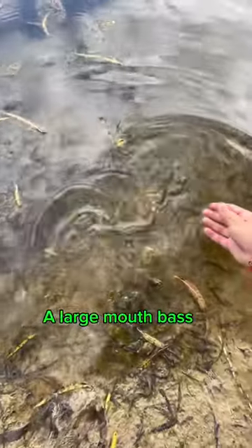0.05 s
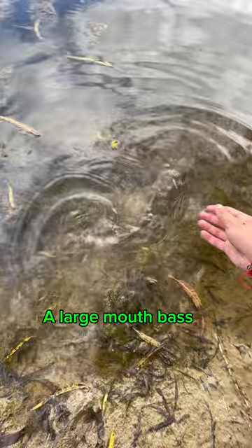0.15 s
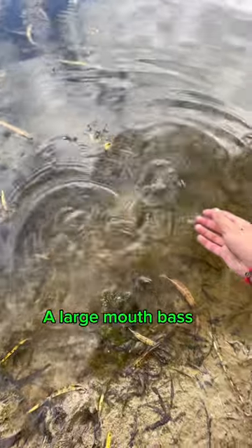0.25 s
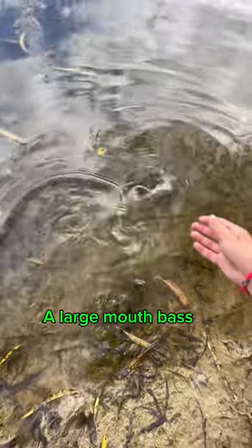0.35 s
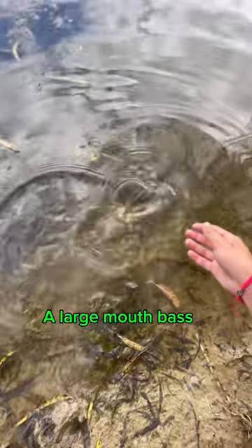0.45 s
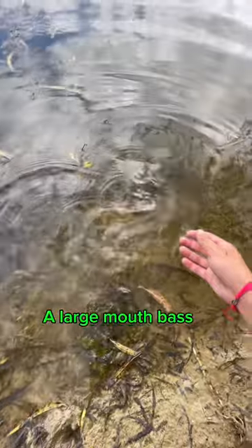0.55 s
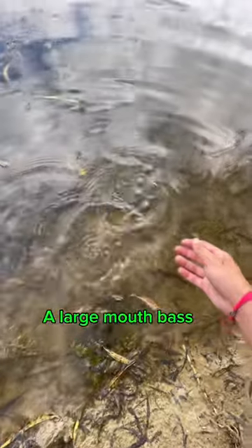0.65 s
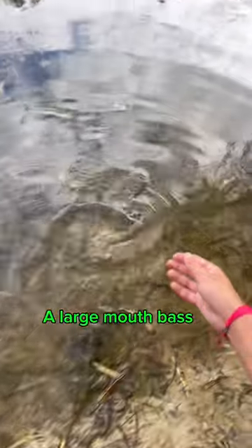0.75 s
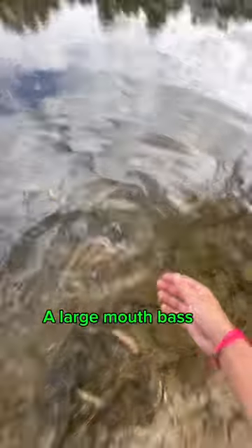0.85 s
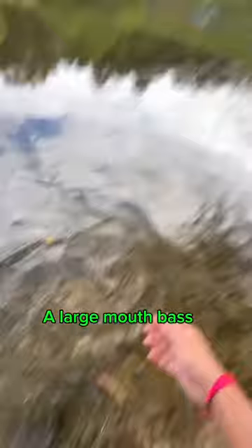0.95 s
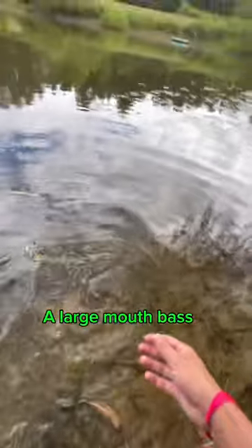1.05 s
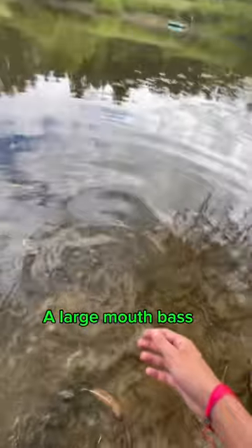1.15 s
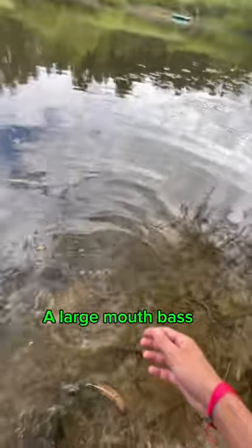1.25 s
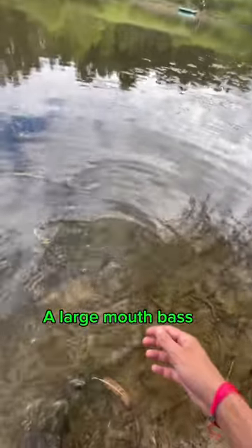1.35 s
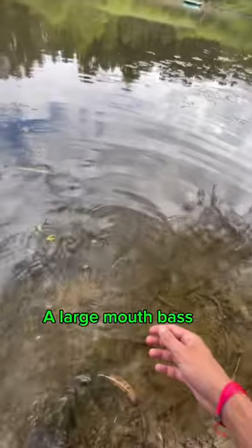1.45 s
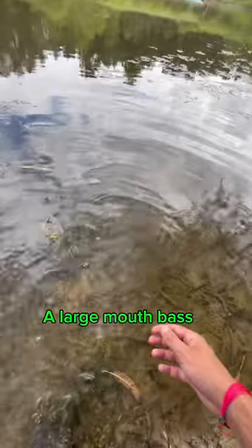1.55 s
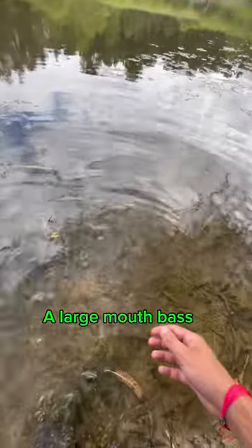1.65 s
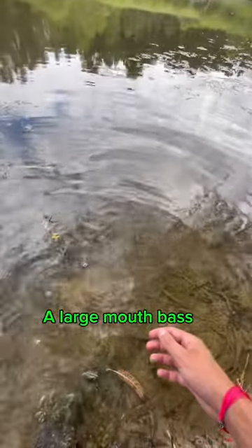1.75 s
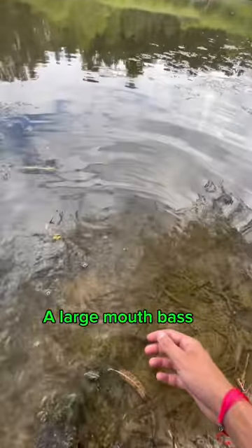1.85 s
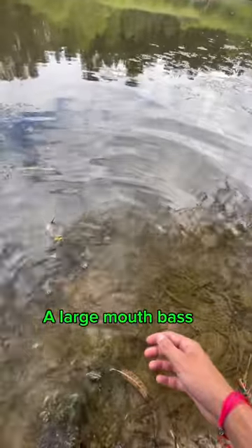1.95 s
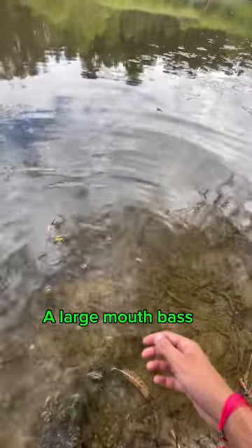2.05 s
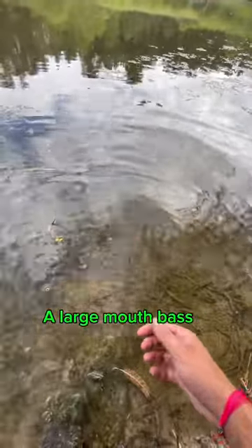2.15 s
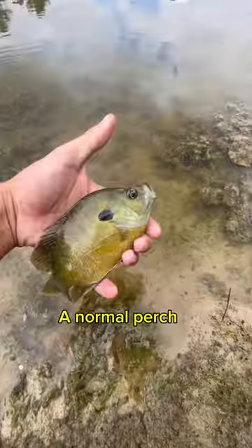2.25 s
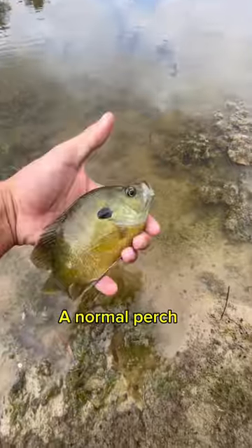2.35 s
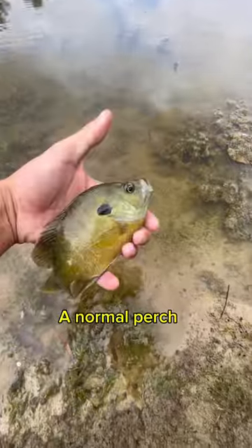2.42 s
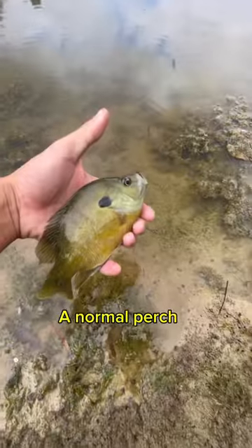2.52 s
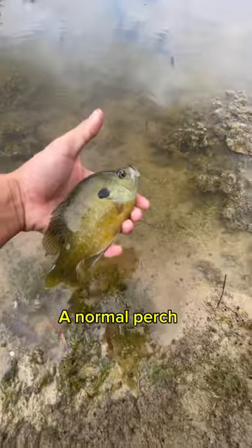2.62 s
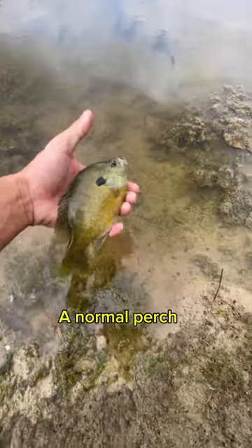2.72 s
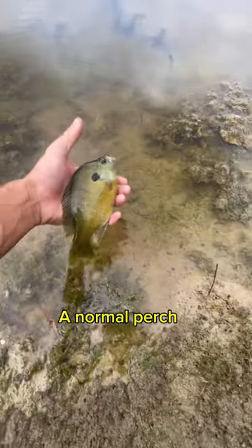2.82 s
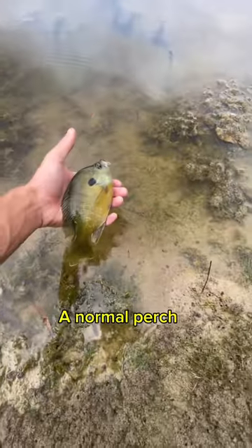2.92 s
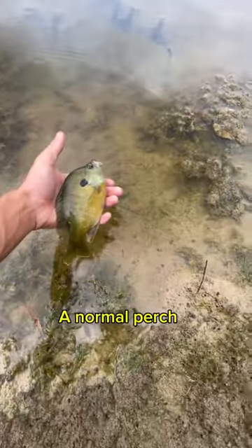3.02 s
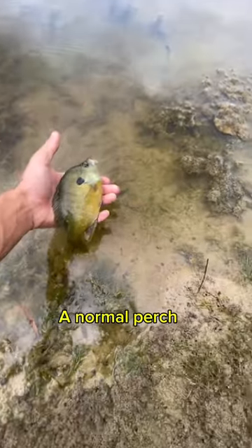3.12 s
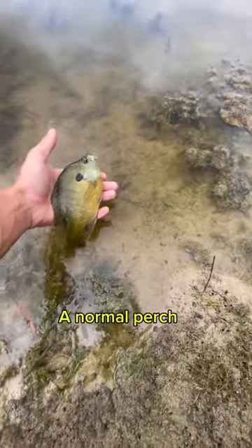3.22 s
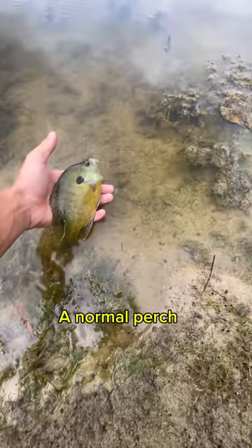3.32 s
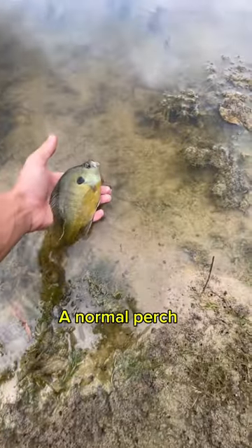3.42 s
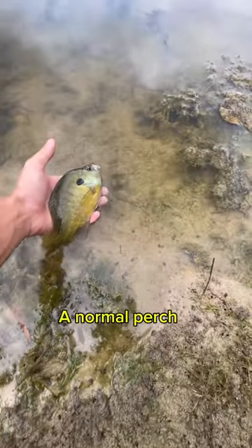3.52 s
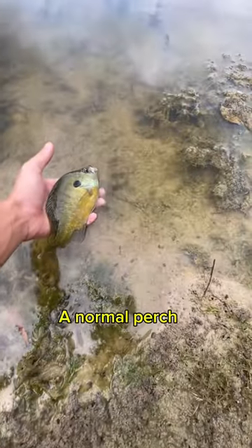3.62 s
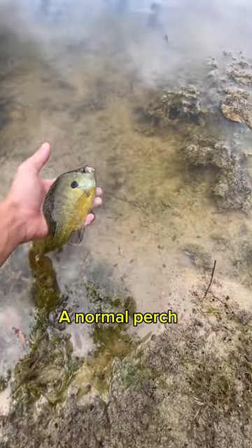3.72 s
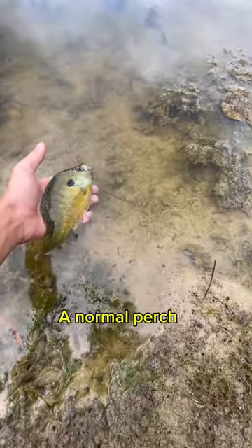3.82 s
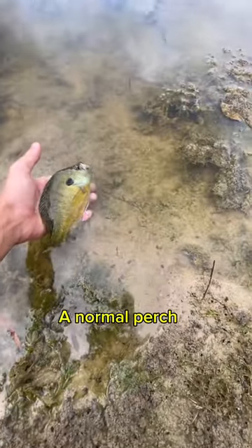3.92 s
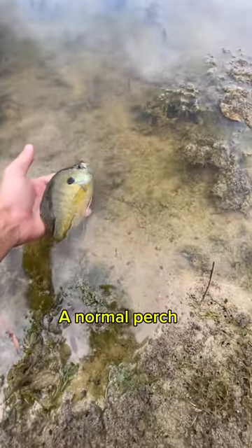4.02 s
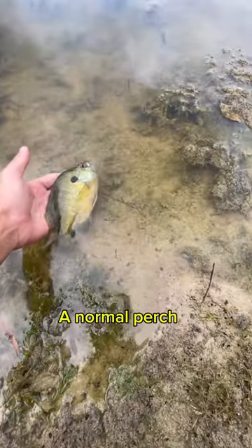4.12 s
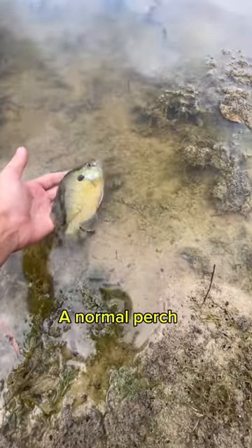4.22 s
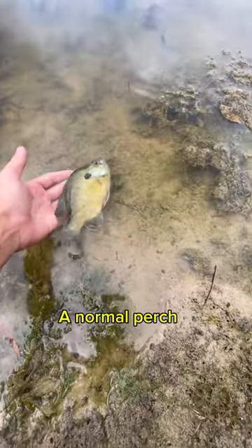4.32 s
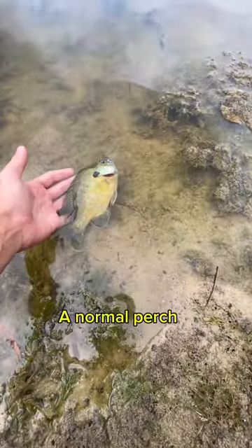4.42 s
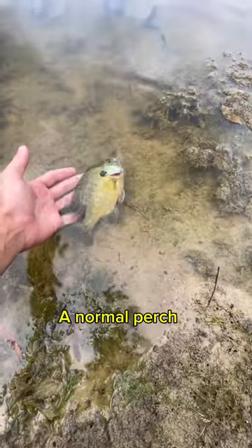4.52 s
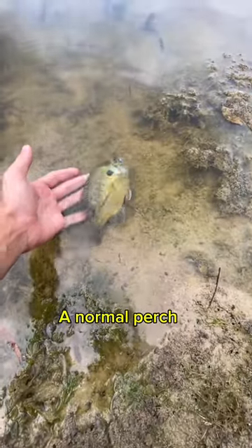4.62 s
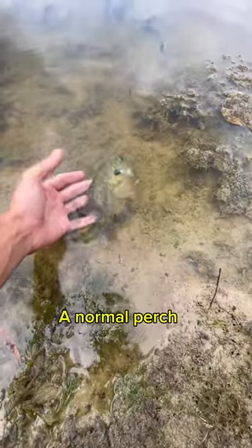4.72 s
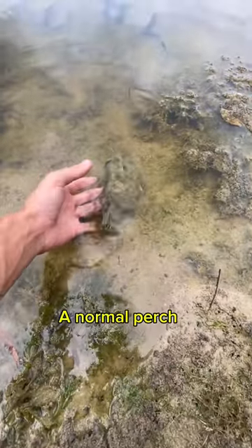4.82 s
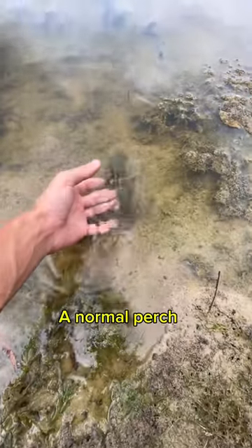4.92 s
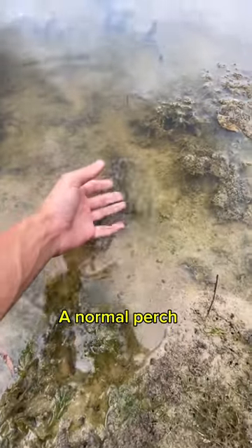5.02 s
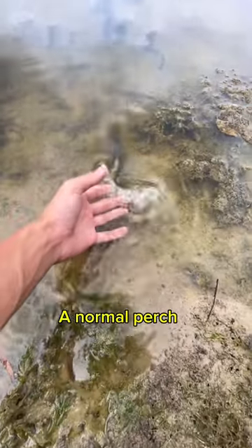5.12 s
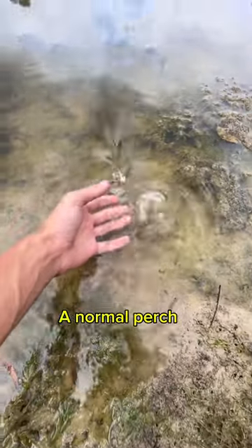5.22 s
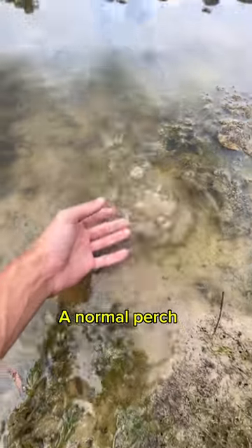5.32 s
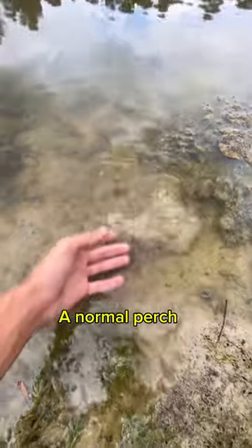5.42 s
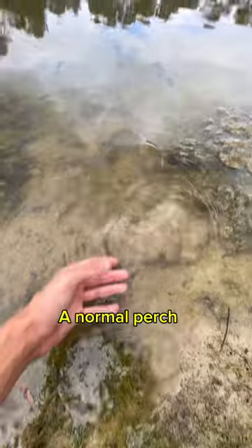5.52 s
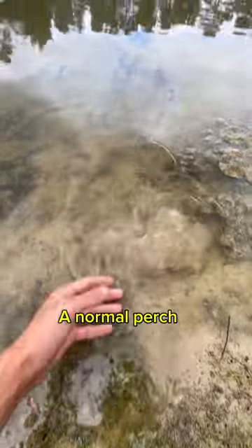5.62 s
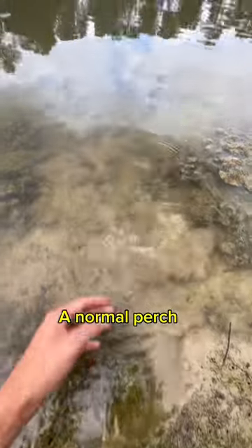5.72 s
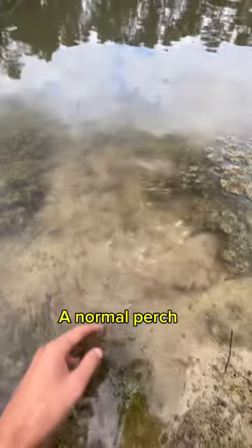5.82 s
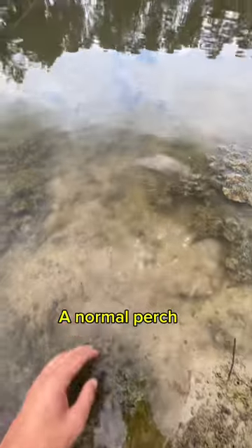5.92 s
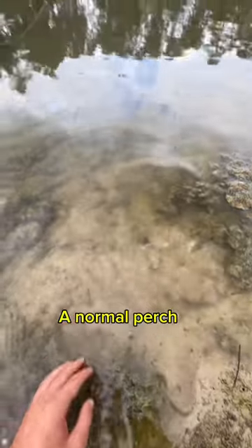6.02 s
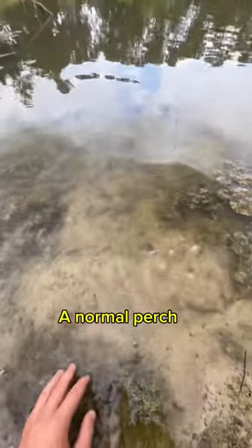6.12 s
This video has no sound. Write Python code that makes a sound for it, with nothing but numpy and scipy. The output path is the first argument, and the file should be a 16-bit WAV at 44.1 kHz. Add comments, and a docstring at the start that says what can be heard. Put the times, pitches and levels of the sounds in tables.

```python
"""Two fish let go in a pond

Two fish are let go by hand in the shallows, close to a phone: the first leaves with a round plop of ringing bubbles.
At a second spot the hand shifts and drips, then a tail flick throws up bubbles and spray that patters back.
Bubbles are gliding sines; drops, spray and wet skin are bursts and clicks of filtered noise.
Small birds whistle from the far bank over soft outdoor air, made of filtered noise.
At the first spot high insects sing too, and a distant engine drones as a low line in rumble."""
import sys
import numpy as np
from scipy import signal
from scipy.fft import rfft, irfft
from scipy.io import wavfile
from scipy.ndimage import uniform_filter1d

SR = 44100
rng = np.random.default_rng(int(sys.argv[2]) if len(sys.argv) > 2 else 0)


def store_pcm(level_fs):
    """Save levels as 16-bit WAV."""
    pcm = np.round(np.clip(level_fs, -1, 1) * 32767).astype(np.int16)
    wavfile.write(sys.argv[1], SR, np.atleast_2d(pcm).T)


N = 271995
TIME = np.arange(N) / SR  # s
FREQ = np.maximum(np.fft.rfftfreq(N, 1 / SR), 1)  # Hz, kept above 0 for logarithms
LEFT_RIGHT = np.array([[1], [-1]])
LEFT_ONLY = np.array([[1], [0]])
MOVE_S = 2.15  # from here on the second spot

# the tail flick: the water is thrashed for a moment, and midway the cavity behind the tail collapses
FLICK_S, COLLAPSE_S, FLICK_END_S = 5.023, 5.142, 5.213
FLICK_ATTACK_S, FLICK_RELEASE_S, COLLAPSE_WIDTH_S, SETTLE_S = 0.022, 0.006, 0.023, 0.09


# the loudest air pockets ringing in the water: t/s, first f/Hz, level/dB, life/s, glide/octaves per life
# (the pitch glides down as a cavity opens, up near the surface)
AIR_POCKETS = [(0.3359, 850, -25, .0205, 0.54), (.3359, 1750, -36.5, 0.0019, -0.046),
               (0.347, 1670, -47, 0.013, 0.52), (.36, 1420, -53, 0.0094, 0.3),
               (.375, 1620, -55.5, 0.022, 0.23), (.771, 1380, -55.5, 0.017, 0.12),
               (3.542, 2680, -50.5, 0.003, 0), (3.76, 1360, -62, 0.0078, 0.17),
               (4.308, 2300, -55.5, 0.0046, .1), (4.828, 6200, -55, .003, -.1),
               (4.92, 5000, -52, .004, .04), (4.938, 4150, -52, .003, .15), (5.003, 258, -46, 0.038, -0.61),
               (5.026, 3100, -39, 0.0046, -0.043), (5.046, 1097, -38.5, 0.015, -0.45),
               (5.055, 2520, -34, 0.0075, -0.37), (5.058, 3050, -38, .005, 0.15),
               (5.064, 2350, -34.5, 0.0053, -.1), (5.069, 580, -40, .024, -0.42),
               (5.08, 1330, -29.5, .006, 0.098), (5.094, 1210, -34, 0.0067, -.25),
               (5.094, 800, -41, .008, .1), (5.102, 933, -27.5, 0.0094, 0.18),
               (5.111, 784, -35.5, 0.012, -0.18), (5.112, 1150, -39, .014, -.1),
               (5.115, 6900, -38, .003, -.04), (5.1275, 636, -23.5, .011, -0.27),
               (5.133, 2700, -34, .004, 0), (5.137, 5080, -29, 0.0046, 0.047),
               (5.138, 381, -28.5, 0.012, -0.024), (5.1445, 1030, -26, 0.0037, -.4),
               (5.147, 450, -28.5, 0.0088, 0.38), (5.1535, 2520, -23, 0.0042, 0.49),
               (5.1536, 1900, -28.5, 0.0027, 0.086), (5.155, 1440, -27.5, 0.0056, 0.016),
               (5.16, 10030, -27, .002, .1), (5.16, 690, -31, 0.011, .3), (5.168, 1015, -33.5, 0.0062, .45),
               (5.166, 370, -40, .018, .2), (5.181, 2220, -40, 0.0036, 0), (5.19, 795, -35.5, .015, .25),
               (5.192, 640, -41, 0.017, -.1), (5.197, 3050, -36, 0.012, 0.12),
               (5.204, 1951, -41, 0.0046, 0.025), (5.208, 1120, -38, 0.013, 0.17),
               (5.2093, 3066, -32.5, 0.0075, -0.19), (5.211, 500, -39, 0.014, -0.1),
               (5.213, 722, -38.5, 0.021, 0.57), (5.23, 1175, -39.5, 0.0088, 0.14),
               (5.241, 1640, -53, .008, 0.047), (5.254, 2450, -50.5, 0.0085, -0.0033),
               (5.254, 815, -44.5, 0.028, 0.27), (5.272, 2380, -53, 0.0076, -.05),
               (5.296, 1180, -60, 0.024, .25), (5.244, 1250, -54, .012, .2), (5.265, 1600, -57, .008, .25),
               (5.294, 2950, -54, .005, .1), (5.308, 2900, -57, .005, .1),
               (5.34, 1450, -50.5, 0.0089, 0.075), (5.351, 2200, -55, .006, -0.073),
               (5.372, 1800, -60, .005, 0.35), (5.408, 2250, -61, 0.0063, .1),
               (5.485, 2550, -53.5, 0.0046, -0.017)]
FAINT_DB, STRONG_DB = -60, -45  # levels of a faint and a strong bubble
FAINT_ONSET_S, STRONG_ONSET_S = 0.00095, 0.00034  # a faint bubble starts more softly


def bubbles(hold=2.7, waver=0.019, lag_s=.00008):
    """Each air pocket rings as a gliding sine that holds for its life, then is choked off."""
    out = np.zeros((2, N))
    for s, first_hz, db, life_s, octaves in AIR_POCKETS:
        onset_s = np.interp(db, [FAINT_DB, STRONG_DB], [FAINT_ONSET_S, STRONG_ONSET_S])
        t = np.arange(int(2 * life_s * SR)) / SR
        wobble = unit(uniform_filter1d(rng.standard_normal(N // 10), size=130))[:len(t)]
        hz = first_hz * 2 ** (octaves * t / life_s) * (1 + waver * wobble)
        # the left side lags a little
        cycles = np.cumsum(hz) / SR - LEFT_ONLY * lag_s * hz
        ring = (1 - np.exp(-t / onset_s)) * np.exp(-(t / life_s) ** hold)
        gain = undb(db + sides(water_pan(s, first_hz)))
        add(out, s, gain * ring * np.sin(2 * np.pi * cycles))
    return out


# heavy water pushed by the tail: f/Hz, level/dB
CHURN_COLOUR = [(150, -30), (350, -1), (600, 3.5), (1100, -1), (1800, -16), (3500, -45)]
# spray torn off by the tail: f/Hz, level/dB
SPRAY_COLOUR = [(600, -21), (1400, 11), (2700, 5.5), (3900, -0.5), (5300, 6.5), (7500, -7.5), (10500, -3.5),
                (14000, -9), (16000, -17)]


def flick(lumps_db=3, churn_trim_db=-2.0, spray_trim_db=-3.0):
    """The tail churns the water and tears off spray, which comes in uneven lumps."""
    balance_db = sides(over_hz(LEFT_MINUS_RIGHT))
    lumps = undb(lumps_db * unit(uniform_filter1d(rng.standard_normal(N), size=260)))

    churn_clicks = grains(per_s=3000, scatter_db=3.0, likeness=1.0)
    churn = unit(colour(churn_clicks, over_hz(CHURN_COLOUR) + balance_db))

    spray_clicks = grains(per_s=5200, scatter_db=2.5, likeness=0.31)
    spray = unit(lumps * colour(spray_clicks, over_hz(SPRAY_COLOUR) + balance_db))
    return undb(churn_trim_db) * churn * churning() + undb(spray_trim_db) * spray * spraying()


def thrash(collapse_db, settle_db):
    """Strength of the flick: steady thrashing, a surge as the cavity collapses, then the water settles."""
    steady = swell(TIME, FLICK_S, FLICK_ATTACK_S, FLICK_END_S, FLICK_RELEASE_S)
    surge = undb(collapse_db) * np.exp(-((TIME - COLLAPSE_S) / COLLAPSE_WIDTH_S) ** 2)
    settling = undb(settle_db) * swell(TIME, FLICK_S, FLICK_ATTACK_S, FLICK_END_S, SETTLE_S)
    return steady + surge + settling


def churning(base_db=-50):
    """Gain of the heavy water pushed by the tail."""
    return undb(base_db) * thrash(collapse_db=13.0, settle_db=-5.5)


def spraying(base_db=-46.5):
    """Gain of the spray torn off by the tail."""
    return undb(base_db) * thrash(collapse_db=4, settle_db=-16.5)


def slap(s=5.0445, hz=1800, db=-23, decay_s=0.00031, pan_db=-10):
    """The tail smacks the surface: a hollow knock, made of a sine that dies away at once."""
    out, t = np.zeros((2, N)), TIME[:SR // 50]
    knock = t / decay_s * np.exp(1 - t / decay_s) * np.sin(2 * np.pi * hz * t)
    add(out, s, undb(db + sides(pan_db)) * knock)
    return out


# the loudest drops striking water or skin: t/s, level/dB (before the shared gain), centre f/Hz
IMPACTS = [(.3, -33.5, 10500), (0.3359, -46, 2000), (.66, -52, 6000), (0.8946, -48.5, 3200),
           (1.294, -45.5, 9500), (1.805, -51, 8900), (2.2458, -53, 10800), (3.42, -49, 9300),
           (3.4716, -47.5, 4460), (3.76, -57, 2000), (3.542, -56.5, 2600), (3.636, -47, 2700),
           (3.6714, -38.5, 4450), (3.8866, -43, 4530), (3.9891, -45.5, 4620), (4.126, -51.5, 4000),
           (4.142, -46.5, 4700), (4.1784, -51, 12500), (4.283, -52.5, 4340), (4.3498, -46.5, 8800),
           (4.4117, -53, 4530), (4.4554, -55.5, 7000), (4.552, -55, 12600), (4.586, -49.5, 10600),
           (4.77, -49, 4970), (4.789, -46.5, 9500), (4.8638, -20, 9460), (4.867, -29.5, 7700),
           (4.9063, -52, 5000), (4.92, -49, 5060), (4.976, -51, 5000), (5.026, -32, 6500),
           (5.042, -36, 3000), (5.078, -36, 10000), (5.094, -29, 5800), (5.127, -34, 5480),
           (5.134, -31, 2600), (5.136, -19.5, 6900), (5.1704, -13, 5800), (5.173, -24, 5400),
           (5.229, -38, 6600), (5.3218, -37.5, 11070), (5.3404, -33, 9100), (5.341, -40.5, 2500),
           (5.384, -34, 7400), (5.42, -37.5, 10500), (5.488, -45, 8350), (5.575, -44.5, 13740),
           (5.795, -45, 14500), (5.867, -41, 10600), (5.9626, -52, 11000)]
# a blow harder by DROP_HALVING_DB is half as long
DROP_DECAY_S, DROP_REFERENCE_DB, DROP_HALVING_DB = .0012, -16.5, 34


def drops(width_hz=4200, rise_s=0.00067, tail_db=-35, tail_s=0.007, gain_db=-7.5,
          likeness=0.58, snap=0.73, skirt_db=-31):
    """Each impact is one sharp snap and a short crackle in a band set by the drop's size, then a faint sizzle."""
    out, t = np.zeros((2, N)), np.arange(SR // 14) / SR
    noise = stereo_noise(likeness)
    for s, db, hz in IMPACTS + drips():
        decay_s = DROP_DECAY_S * 2 ** ((DROP_REFERENCE_DB - db) / DROP_HALVING_DB)
        low_hz = np.hypot(width_hz / 2, hz) - width_hz / 2
        edges_hz = [low_hz, min(low_hz + width_hz, .45 * SR)]
        band = signal.butter(3, edges_hz, "band", fs=SR, output="sos")

        fall = np.exp(-t / decay_s) + undb(tail_db) * np.exp(-t / tail_s)
        burst = noise[:, int(s * SR):][:, :len(t)] * (1 - np.exp(-t / rise_s)) * fall
        # a little unfiltered noise fills in around the band
        crackle = unit(signal.sosfilt(band, burst) + undb(skirt_db) * burst)
        spike = unit(signal.sosfilt(band, np.arange(len(t)) == 10))

        # brief impacts put more of their energy into the snap
        hard = np.clip(snap, 0, 1) * min(0.0011 / decay_s, 1)
        mix = np.sqrt(1 - hard) * crackle + np.sqrt(hard) * spike
        impact = undb(db + gain_db) * mix * np.sqrt(decay_s / t[-1])

        # it reaches each port of the phone at its own instant (in samples)
        lags = rng.integers(0, 14, 2)
        pair = np.array([np.roll(port, lag) for port, lag in zip(impact, lags)])
        pan_db = water_pan(s, hz) if s > FLICK_S else 0
        add(out, s, undb(sides(pan_db)) * pair)
    return out


# spells of falling spray: from t/s, length/s, drips per s, middle level/dB (before the drops' gain), middle f/Hz
FALLING_SPRAY = [(5.25, .3, 52, -51.5, 3840), (5.55, .42, 40, -52, 7100)]


def drips(scatter_db=8, spread_octaves=1.13):
    """Faint drips at chance moments, as rows like those of the drops."""
    rows = []
    for start, length, per_s, db, hz in FALLING_SPRAY:
        for when, size, pitch in rng.random((int(per_s * length), 3)):
            drip_hz = hz * 2 ** (spread_octaves * (pitch - .5))
            rows.append((start + length * when, db + scatter_db * (size - .5), drip_hz))
    return rows


# how far the water sounds lean to one side at the second spot: f/Hz, left minus right level/dB
LEFT_MINUS_RIGHT = [(100, -3), (380, 3.5), (700, 8.5), (1290, 4), (1800, -6), (2400, -9), (3200, -6.5),
                    (4400, 1), (15000, -1.5)]


def water_pan(s, hz, first_spot_db=-5.5):
    """Left minus right dB of a sound on the water: fixed at the first spot, set by pitch at the second."""
    return first_spot_db if s < MOVE_S else np.interp(hz, *np.transpose(LEFT_MINUS_RIGHT))


def foam(per_s, low_hz, high_hz, cycles, scatter_db, glide, from_s, for_s):
    """A swarm of tiny bubbles, each ringing a few cycles at its own pitch; rms 1."""
    out = np.zeros((2, N))
    for when, pitch, size, turn in rng.random((int(per_s * for_s), 4)):
        hz = low_hz * (high_hz / low_hz) ** pitch
        # age 1 is reached after the given number of cycles
        age = np.arange(int(4 * cycles * SR / hz)) * hz / (SR * cycles)
        # the right side starts at a chance point of the cycle
        phase = 2 * np.pi * (cycles * age * (1 + glide * age) + np.array([[0], [turn]]))
        ring = np.sqrt(age) * np.exp(-2 * age) * np.sin(phase)
        add(out, from_s + when * for_s, undb(scatter_db * size ** 2) * ring)
    return unit(out)


def froth(flick_db=-10, wave_db=-63, hand_db=-10, foam_for_s=.7):
    """Small bubbles burst in the spray, larger ones gurgle in the wave, and a few fizz round the wet hand."""
    balance_db = sides(over_hz(LEFT_MINUS_RIGHT))
    wake = foam(per_s=900, low_hz=2000, high_hz=12880, cycles=11.4, scatter_db=12, glide=0.022,
                from_s=FLICK_S, for_s=foam_for_s)
    wake = unit(colour(wake, over_hz(SPRAY_COLOUR) + 3.4 * np.log2(FREQ) + balance_db))

    wave = foam(per_s=170, low_hz=804, high_hz=3200, cycles=15.0, scatter_db=4, glide=0.08,
                from_s=FLICK_S, for_s=foam_for_s)
    wave = unit(colour(wave, balance_db))
    wave_swell = swell(TIME, FLICK_S, FLICK_ATTACK_S, FLICK_END_S, SETTLE_S)

    hand = foam(per_s=170, low_hz=3120, high_hz=12200, cycles=21, scatter_db=18, glide=0.0097,
                from_s=0, for_s=TIME[-1])
    flick_froth = undb(flick_db) * wake * spraying()
    return flick_froth + undb(wave_db) * wave * wave_swell + undb(hand_db) * hand * handling()


# wet skin, grit and foam: f/Hz, level/dB
RUSTLE_COLOUR = [(500, -14), (1400, -1), (2600, 2.5), (4000, -3.5), (6000, 3), (9000, 3), (11500, -13),
                 (15000, -9)]


def rustle():
    """Tiny bursts of wet skin, grit and foam, made of a dense patter of filtered clicks."""
    clicks = grains(per_s=5000, scatter_db=3.5, likeness=0)
    return unit(colour(clicks, over_hz(RUSTLE_COLOUR))) * handling()


# movements of the wet hand, each a swell of rustle and fizz: t/s, level/dB, half width/s
WET_HAND_MOVES = [(.8, -69, 0.35), (2.22, -68.5, 0.068), (2.82, -67, 0.22), (3.85, -76, 0.96),
                  (5.25, -66, 0.41), (5.72, -64.5, 0.23), (6.15, -70, 0.19)]


def handling(rest_db=-79.5):
    """Gain of the wet hand: a swell for every movement over a faint rest level."""
    power = undb(rest_db) ** 2
    for s, db, width_s in WET_HAND_MOVES:
        power = power + (undb(db) * np.exp(-((TIME - s) / width_s) ** 2)) ** 2
    return np.sqrt(power)


# cracks of the slipping fish: f/Hz, level/dB
SQUELCH_COLOUR = [(250, -11), (500, -9.5), (750, 2), (1100, -17.5), (2300, 2), (3000, 0), (3900, -4),
                  (5500, -2), (7800, -5.5), (10000, -5), (13000, -19), (16000, -17)]


def squelch(s=2.8638, db=-35, rise_s=0.0048, fall_s=0.0047, tail_db=-21, tail_s=0.075):
    """The wet fish slips in the palm: a tight cluster of tiny cracks and a trailing hiss."""
    before, after = np.maximum(s - TIME, 0), np.maximum(TIME - s, 0)
    fall = np.exp(-after / fall_s) + undb(tail_db) * np.exp(-after / tail_s)
    clicks = grains(per_s=8200, scatter_db=1.0, likeness=0.079)
    return undb(db) * np.exp(-before / rise_s) * fall * unit(colour(clicks, over_hz(SQUELCH_COLOUR)))


def bump(s=0.924, hz=58, length_s=0.063, db=-36):
    """A soft low thud as the phone swings round: a low sine that swells and fades."""
    return undb(db) * np.exp(-((TIME - s) / length_s) ** 2) * np.sin(2 * np.pi * hz * (TIME - s))


# both tables: t/s, top f/Hz, level/dB, attack/s, climb/s, sag (share of pitch lost per s), echo level/dB
# chirps that leap up, then level off or droop
LEAPING_CHIRPS = [(3.137, 3610, -48.5, 0.0043, .009, 9, -9.5), (3.2135, 3640, -45, .004, 0.0132, 14, -13.5),
                  (4.504, 3670, -58, 0.0041, .016, 2, -3), (4.567, 3770, -53.5, 0.0061, .02, 3, -5.5),
                  (4.651, 3630, -53, 0.006, .02, 3, -5), (5.995, 3600, -57, .005, 0.0176, 3, -4.5),
                  (6.118, 3520, -57, 0.0055, 0.017, 3, -3.5)]
# thin rising calls of another bird
THIN_SEEPS = [(.478, 7790, -47, .007, .058, 1.5, -8.5), (.905, 7930, -38.5, 0.043, .056, 1.5, -17),
              (1.23, 7770, -62, .006, .05, 1.5, -3)]


def bird(calls, leap, end_s, release_s, pan_db, lag_s, quaver, echo_s, late_db, late_s,
         delay_s=0.011, turn_s=.008):
    """A quavering whistle climbs to its top pitch, then sags; the bank echoes it early, the trees late."""
    direct, scattered, t = np.zeros((2, N)), np.zeros((2, N)), TIME[:SR // 10]
    for s, top_hz, db, attack_s, climb_s, sag_per_s, echo_db in calls:
        climb = 1 - leap * (1 - np.sin(np.pi / 2 * np.minimum(t / climb_s, 1)))
        # the sag sets in gently after the top
        past_top = np.maximum(t - climb_s, 0)
        sag = sag_per_s * past_top ** 2 / (past_top + turn_s)
        wobble = unit(uniform_filter1d(rng.standard_normal(N // 20), size=70))[:len(t)]
        hz = top_hz * (climb - sag) * (1 + quaver * wobble)
        cycles = np.cumsum(hz) / SR - LEFT_ONLY * lag_s * hz
        envelope = swell(t, 0, attack_s, end_s, release_s)
        call = undb(db + sides(pan_db)) * envelope * np.sin(2 * np.pi * cycles)
        add(direct, s, call)
        add(scattered, s, undb(echo_db) * call)
    early = echo(scattered, echo_s, delay_s)
    late = undb(late_db) * echo(scattered, late_s, delay_s)
    return direct + early + late


# far buzzy notes and whistles: t/s, length/s, f/Hz, width/Hz, level/dB (before its fades)
FAR_NOTES = [(0.524, 0.12, 4080, 261, -70), (1.221, 0.065, 3260, 60, -74), (1.354, 0.3, 4020, 276, -71)]


def trills():
    """Far bird notes, blurred by distance into narrow swelling bands of noise."""
    out = np.zeros((2, N))
    for s, length_s, hz, width_hz, db in FAR_NOTES:
        band = np.exp(-((FREQ - hz) / width_hz) ** 2 / 2)
        note = unit(irfft(rfft(rng.standard_normal((2, N))) * band, N))
        count = int(length_s * SR)
        add(out, s, undb(db) * note[:, :count] * signal.windows.tukey(count, .5))
    return out


def drone(hz=62.45, hum_db=-48, rumble_db=-54, fade_db_per_s=2.5, waver_db=1.0):
    """A distant engine: one low line in a bed of rumble, wavering as it slowly fades."""
    # f/Hz, level/dB
    rumble_colour = [(15, -30), (35, -12.0), (58, -4.0), (90, -6.5), (160, -21.5), (600, -55.5)]
    rumble = unit(colour(stereo_noise(0.85), over_hz(rumble_colour)))
    hum = unit(np.sin(2 * np.pi * hz * TIME))
    waver = unit(uniform_filter1d(rng.standard_normal(N), size=5000))
    gain = undb(waver_db * waver - fade_db_per_s * TIME) * first_spot()
    return gain * (undb(hum_db) * hum + undb(rumble_db) * rumble)


# outdoor air at the first and at the second spot: f/Hz, level/dB
FIRST_AIR_COLOUR = [(53, -60), (90, 2.5), (150, -2.5), (231, -4), (280, -9.5), (386, -6), (429, -9.5),
                    (782, -10), (990, -13), (2280, -37), (3980, -38.5), (5370, -52), (8780, -40),
                    (10600, -30), (15000, -84)]
SECOND_AIR_COLOUR = [(20, -11), (40, -6.5), (70, 3.5), (120, -1), (250, -6.5), (380, -13.5), (750, -14),
                     (1100, -28), (1700, -38.5), (5000, -35.5), (8500, -79), (10800, -36), (12000, -72),
                     (15000, -62)]
# how alike the air is on both sides: f/Hz, correlation of left and right
AIR_CORRELATION = [(60, 0.8), (150, 0.85), (290, 0.86), (640, -0.49), (1400, -0.54), (7000, -0.029),
                   (12000, 1)]
# phrases of a high insect: t/s, length/s, level/dB (before the rasp)
INSECT_PHRASES = [(0, 0.19, -78), (.27, .43, -83), (0.922, 0.31, -68.5), (1.38, 0.346, -71.5),
                  (1.9, 0.26, -72)]


def air(first_db=-54, second_db=-54.0, pulse_db=3, stroke_hz=52):
    """Soft outdoor rumble and hiss, different at the two spots; high insects sing at the first."""
    likeness = over_hz(AIR_CORRELATION)
    first = unit(colour(stereo_noise(likeness), over_hz(FIRST_AIR_COLOUR)))
    second = unit(colour(stereo_noise(likeness), over_hz(SECOND_AIR_COLOUR)))

    # insects: a narrow band of noise round 8850 Hz, pulsing in a quick rasp
    insects = unit(colour(stereo_noise(0), -np.minimum(((FREQ - 8850) / 280) ** 2, 90)))
    phrases = sum(undb(db) * swell(TIME, s, attack_s=0.064, end=s + length_s, release_s=0.017)
                  for s, length_s, db in INSECT_PHRASES)
    rasp = undb(pulse_db * np.sin(2 * np.pi * stroke_hz * TIME)) * phrases

    at_first = first_spot()
    return at_first * (undb(first_db) * first + insects * rasp) + (1 - at_first) * undb(second_db) * second


def first_spot(fade_s=0.018):
    """1 at the first spot, 0 at the second, with a quick fade between."""
    return np.clip(.5 + (MOVE_S - TIME) / fade_s, 0, 1)


def undb(db):
    """Decibels to gain."""
    return 10 ** (np.asarray(db) / 20)


def unit(x):
    """Scale to rms 1."""
    return x / np.sqrt(np.mean(x ** 2) + 1e-30)


def over_hz(table):
    """A table of (f/Hz, value) read at every frequency."""
    hz, value = np.transpose(table)
    return np.interp(np.log(FREQ), np.log(hz), value)


def colour(x, db):
    """Filter by a dB value for every frequency."""
    return irfft(rfft(x) * undb(db), N)


def sides(pan_db):
    """Left and right dB for a level difference."""
    return LEFT_RIGHT * pan_db / 2


def add(out, s, sound):
    """Mix a stereo sound in at a time."""
    i = max(int(s * SR), 0)
    out[:, i:i + sound.shape[1]] += sound[:, :max(N - i, 0)]


def stereo_noise(likeness):
    """White noise whose two channels are correlated as given."""
    mid, side = rfft(rng.standard_normal((2, N)))
    c = np.clip(likeness, -1, 1)
    return irfft(mid * np.sqrt(1 + c) + LEFT_RIGHT * side * np.sqrt(1 - c), N)


def grains(per_s, scatter_db, likeness):
    """A dense patter of clicks of very unequal size, as alike in both channels as given."""
    size = undb(scatter_db * np.minimum(rng.exponential(size=N), 4))
    struck = rng.random(N) < per_s / SR
    return struck * size * stereo_noise(likeness)


def swell(t, start, attack_s, end, release_s):
    """An envelope that rises, holds until its end, then dies away."""
    return np.clip((t - start) / attack_s, 0, 1) * np.exp(-np.maximum(t - end, 0) / release_s)


def echo(x, decay_s, delay_s=0):
    """A scattered echo that arrives after a delay and dies away, different at each ear."""
    t = TIME[:SR // 2]
    scatter = rng.standard_normal((2, len(t))) * np.exp(-t / decay_s) * (t >= delay_s)
    tail = unit(scatter) / np.sqrt(len(t))
    return signal.fftconvolve(x, tail, axes=1)[:, :N]


def reflections(x, db, decay_s):
    """A sound together with its echo."""
    return x + undb(db) * echo(x, decay_s)


def scene():
    """Near water with quick echoes off hand and bank, far birds echoed by the trees, and the outdoor air."""
    ringing = reflections(bubbles() + slap(), db=-13, decay_s=0.0079)
    splashes = reflections(drops() + flick() + rustle(), db=-9.5, decay_s=0.0046)
    water = ringing + splashes + froth() + squelch()
    chirp = bird(LEAPING_CHIRPS, leap=0.222, end_s=0.023, release_s=0.0025, pan_db=5.5, lag_s=0.00045,
                 quaver=0.004, echo_s=0.036, late_db=-6.5, late_s=0.21)
    seep = bird(THIN_SEEPS, leap=0.21, end_s=0.055, release_s=0.0034, pan_db=-1.5, lag_s=-0.000039,
                quaver=0.015, echo_s=.03, late_db=-5, late_s=0.13)
    return water + bump() + chirp + seep + trills() + drone() + air()


def record(dry, top_hz=16200):
    """The phone's ports dip and lift the treble; the top is cut."""
    # f/Hz, level/dB
    ports = [(6300, -2), (7600, -8.0), (9500, -3), (11500, 0.5), (13800, -9.0), (16000, -11.0)]
    ported = colour(dry, over_hz(ports))
    return signal.sosfilt(signal.ellip(8, .2, 70, top_hz, fs=SR, output="sos"), ported)


dry = scene()
out = record(dry)
store_pcm(out)
```